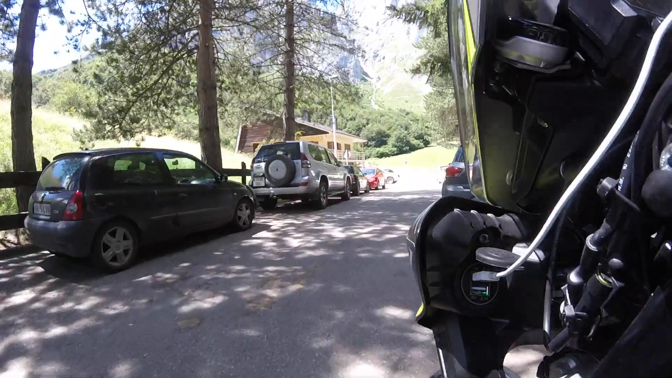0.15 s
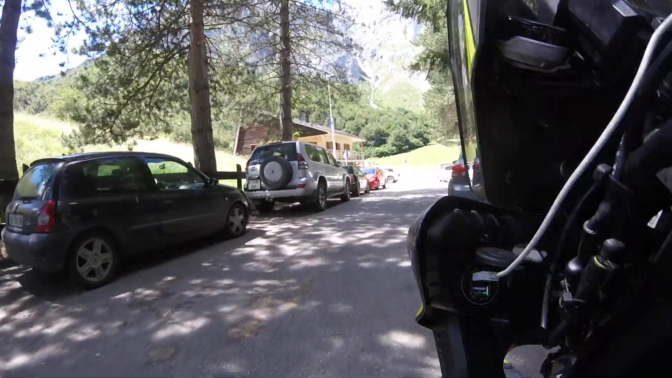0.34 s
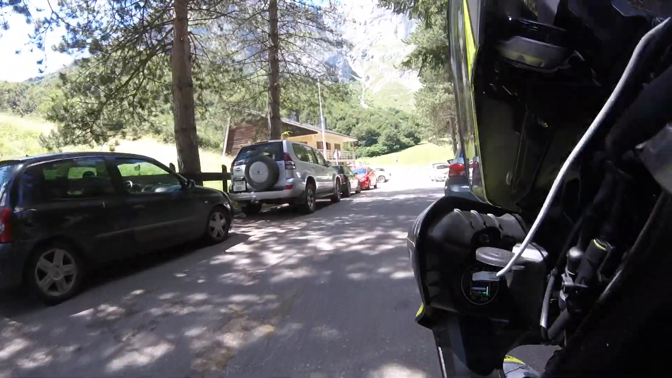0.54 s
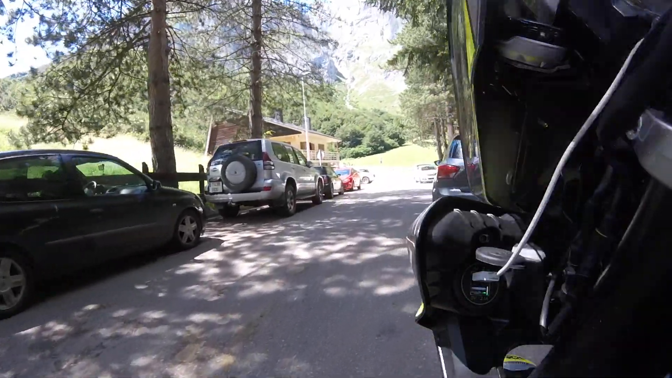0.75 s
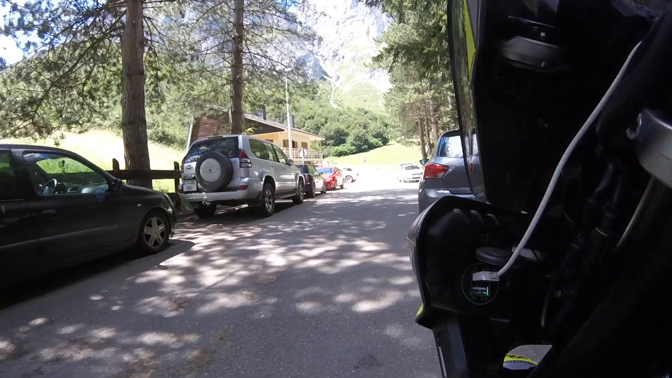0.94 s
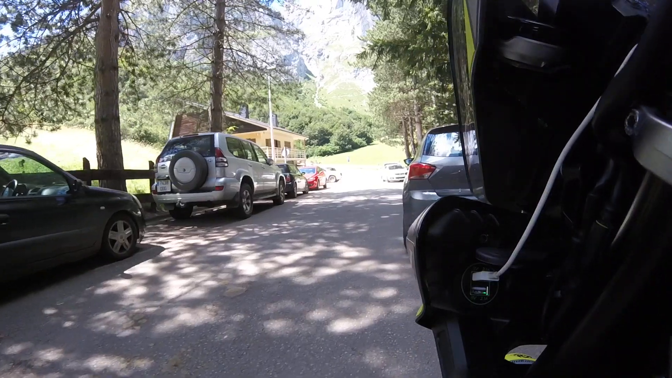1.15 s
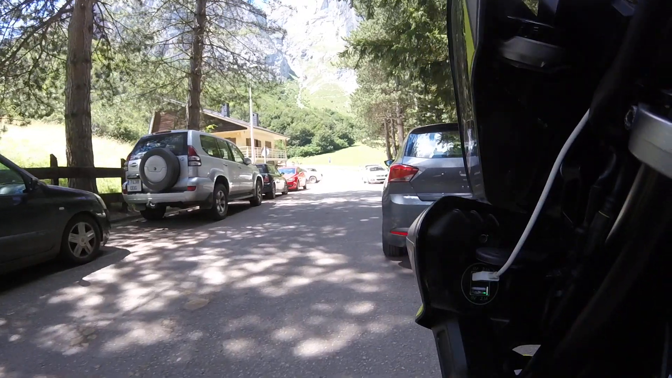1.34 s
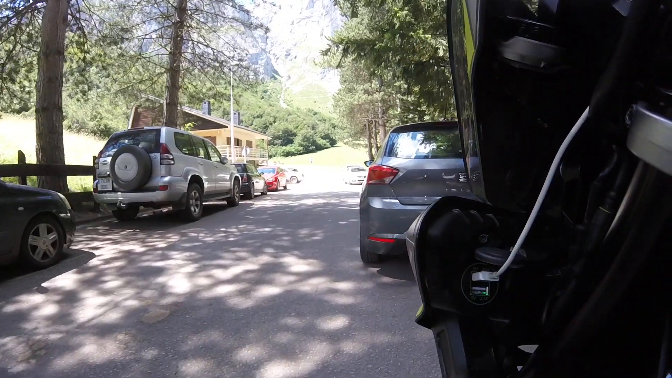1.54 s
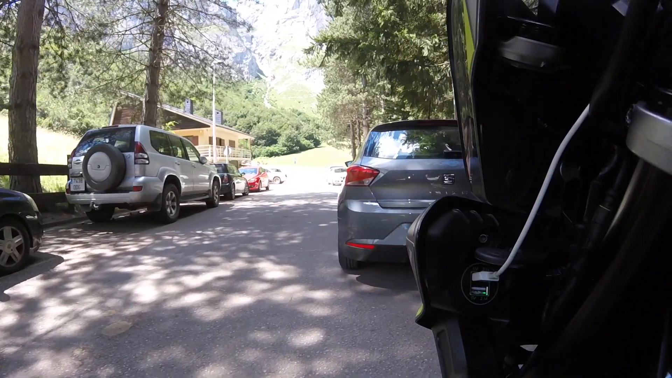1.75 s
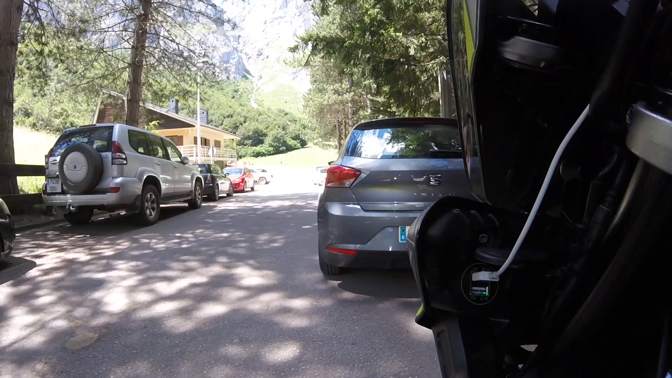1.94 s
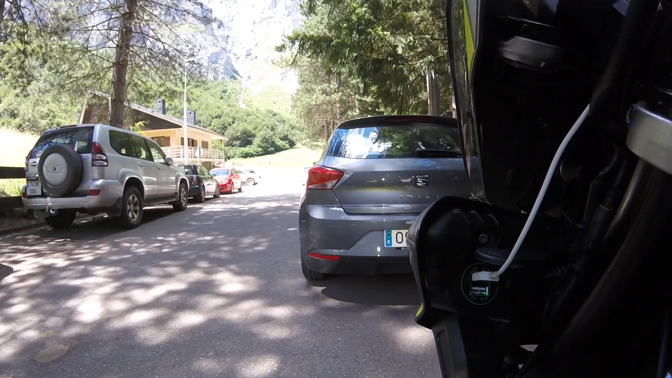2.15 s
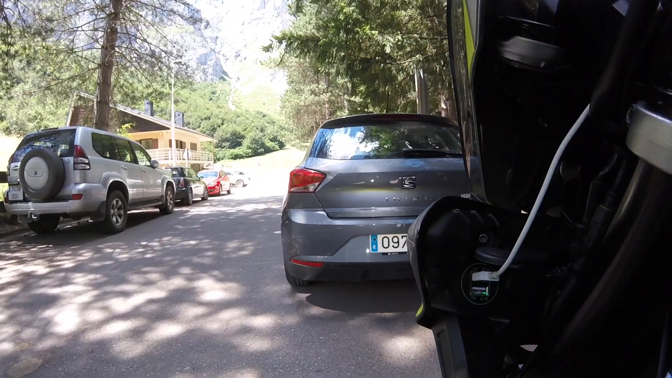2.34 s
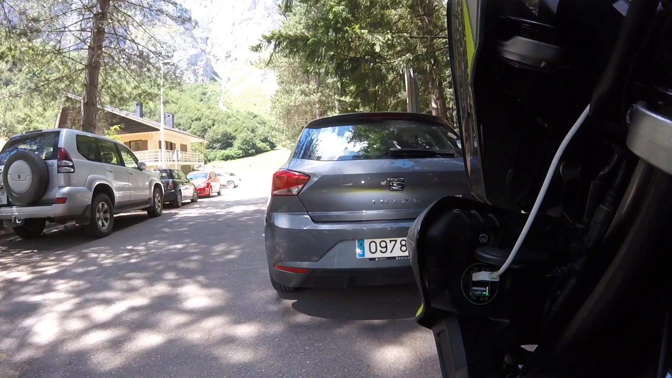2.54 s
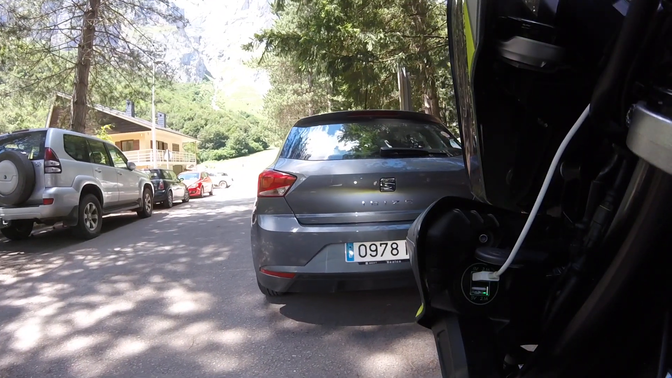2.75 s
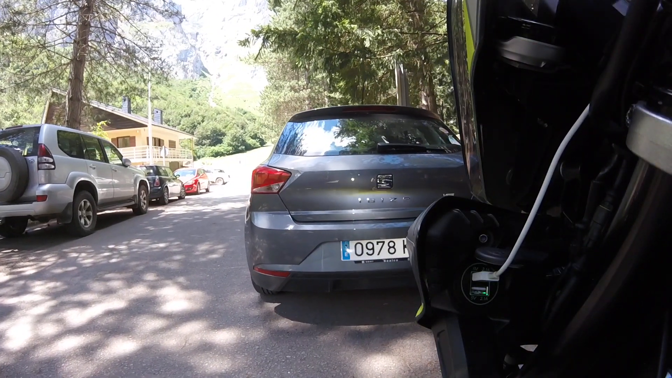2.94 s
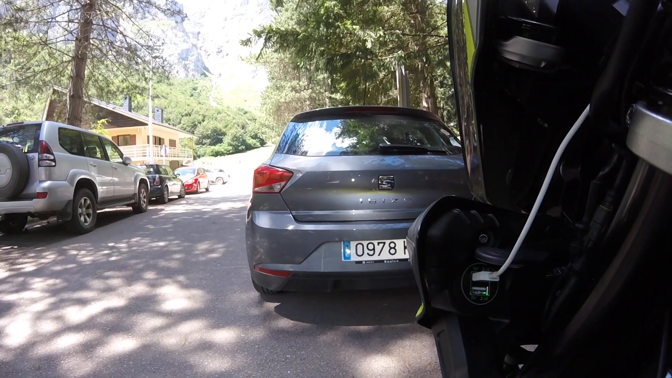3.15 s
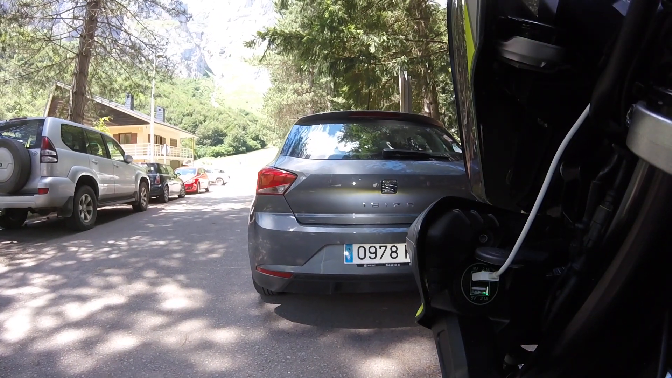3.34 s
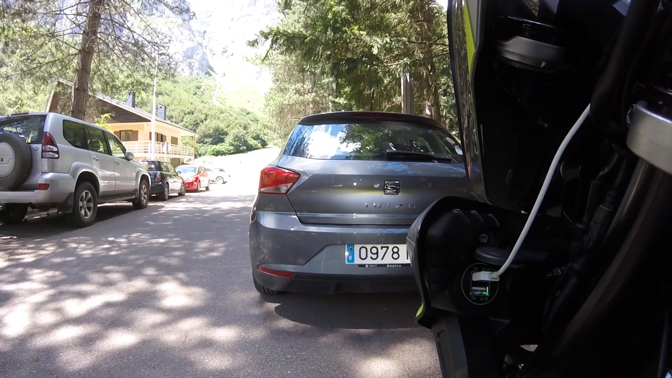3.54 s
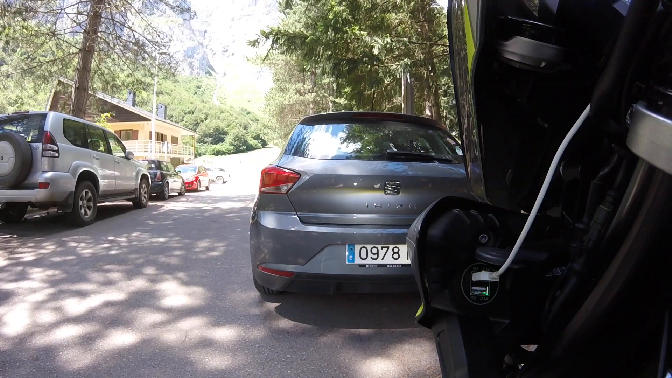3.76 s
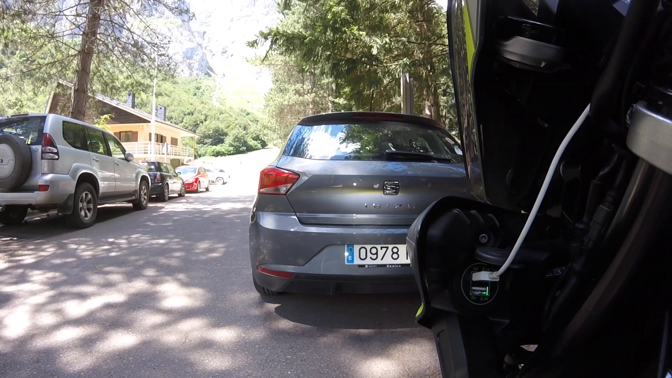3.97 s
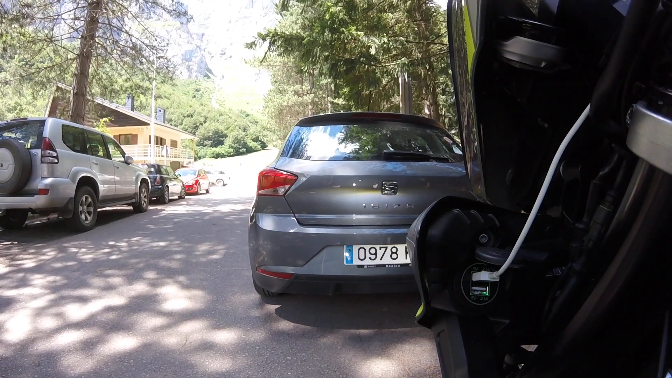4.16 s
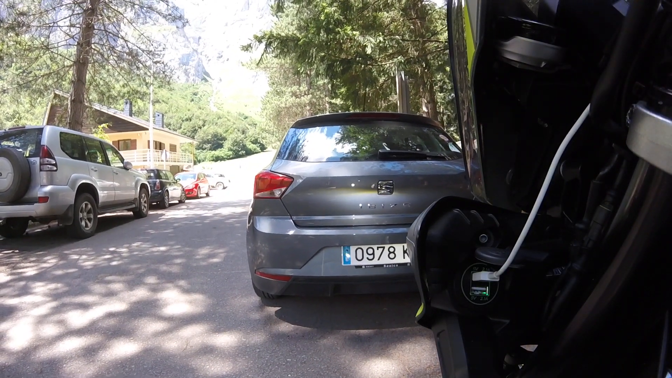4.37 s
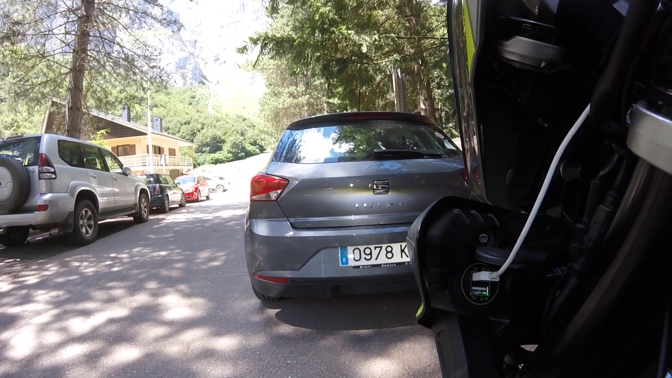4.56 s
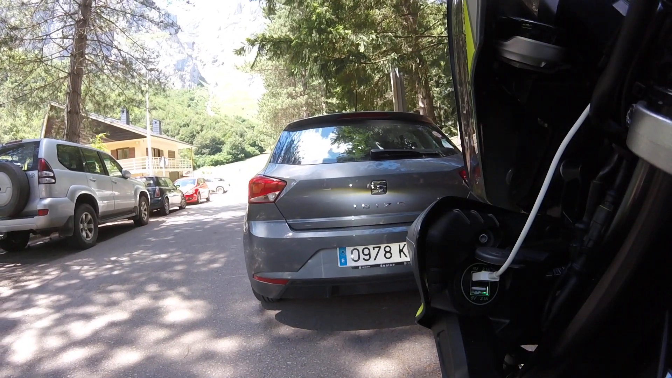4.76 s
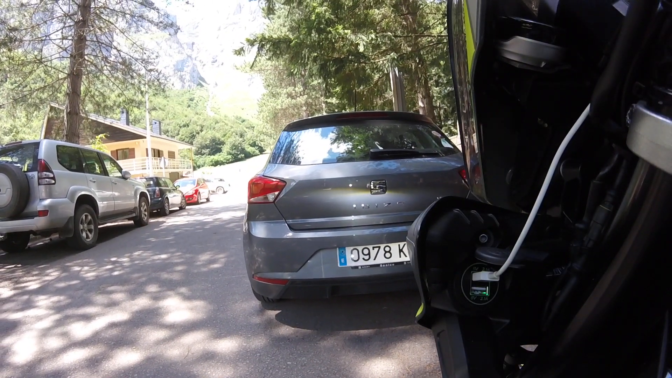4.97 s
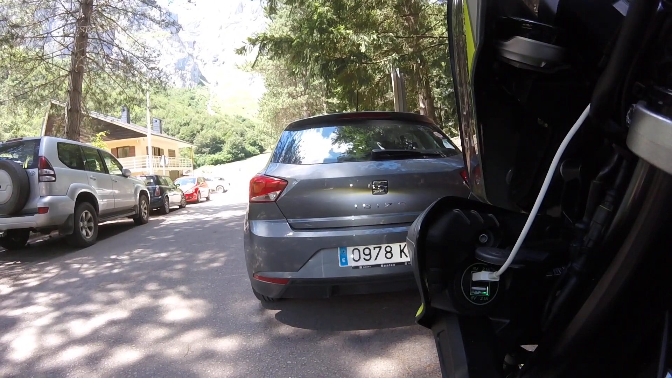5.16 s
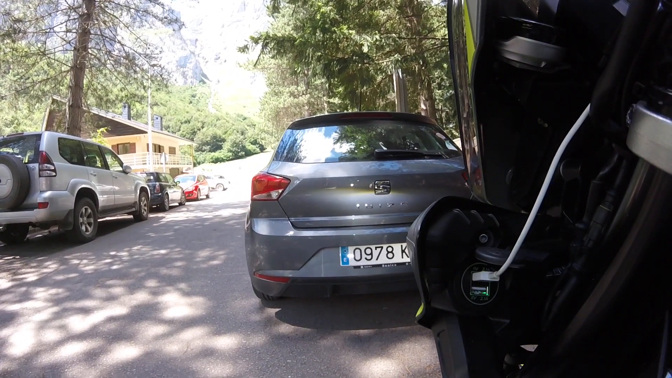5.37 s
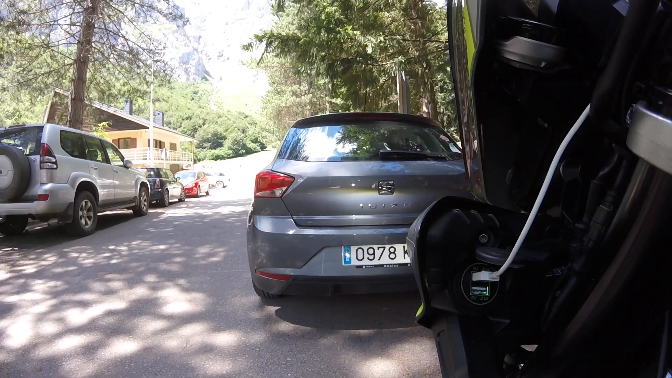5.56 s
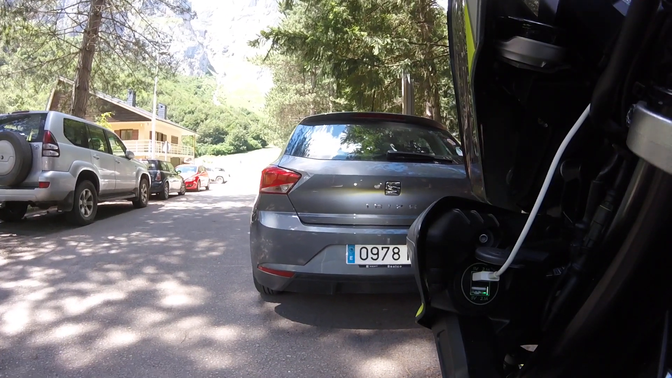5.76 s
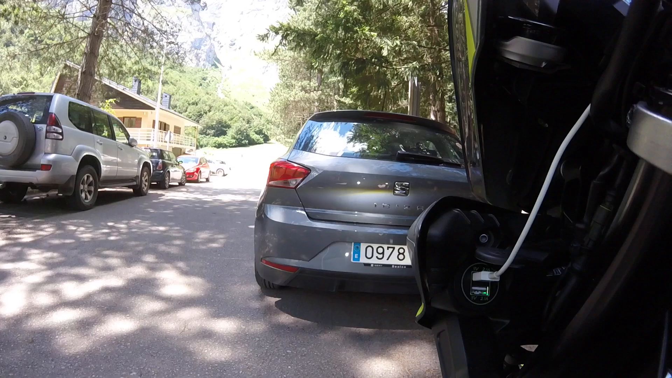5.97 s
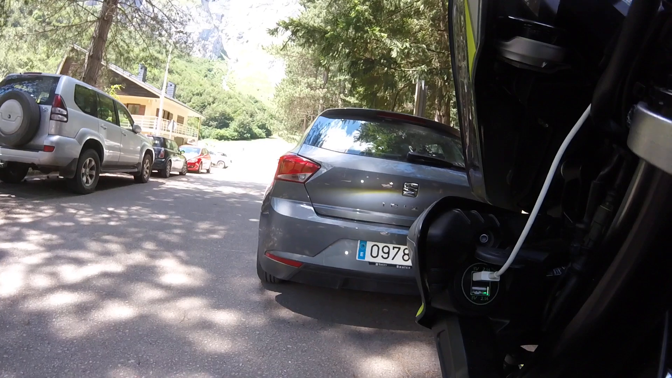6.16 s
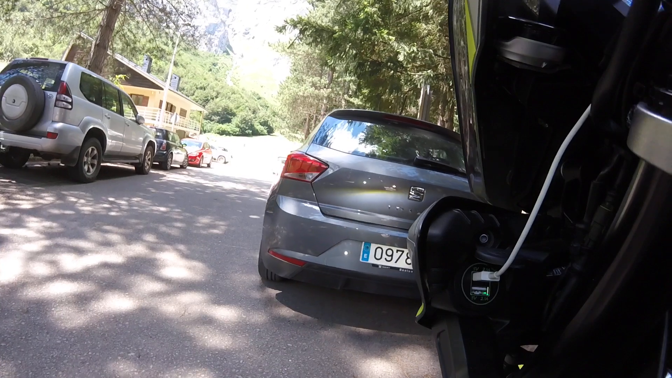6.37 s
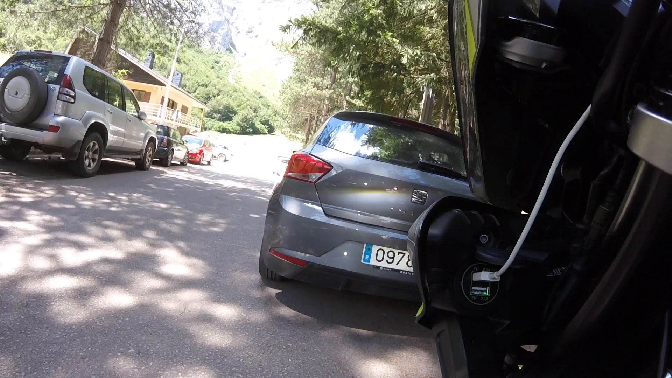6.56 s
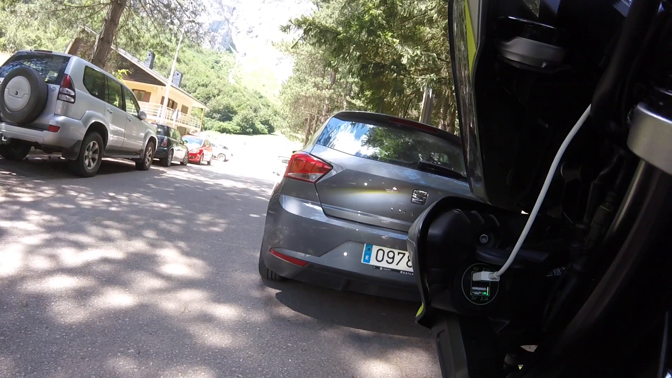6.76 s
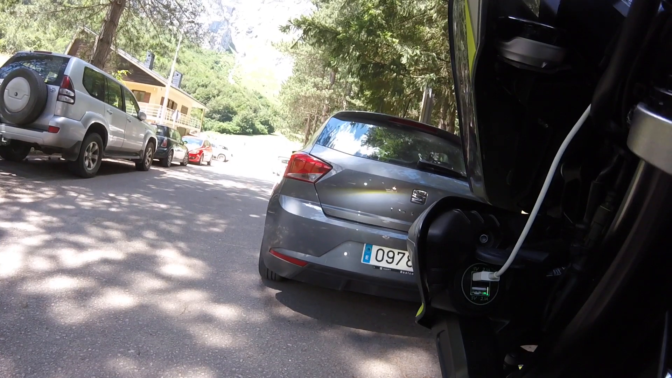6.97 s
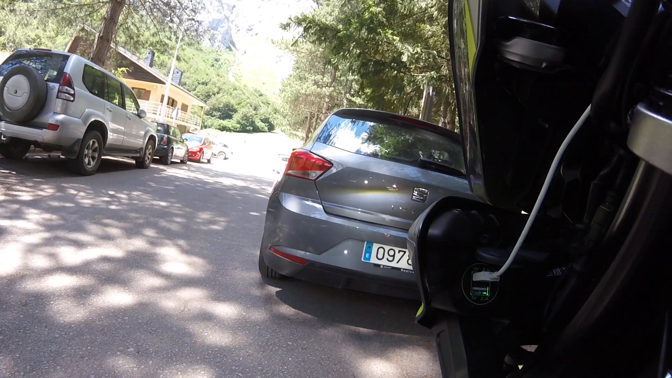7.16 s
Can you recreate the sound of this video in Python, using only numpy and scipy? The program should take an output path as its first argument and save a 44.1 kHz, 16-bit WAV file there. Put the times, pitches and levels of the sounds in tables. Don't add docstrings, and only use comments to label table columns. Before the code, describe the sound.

Bassy shuddering and tyre roar die away as a motorcycle brakes, then a twin engine idles unevenly while boots and stand bump the frame.

```python
import sys
import numpy as np
from scipy import signal
from scipy.fft import rfft, irfft
from scipy.io import wavfile
from scipy.ndimage import uniform_filter1d

SR = 44100
rng = np.random.default_rng(int(sys.argv[2]) if len(sys.argv) > 2 else 0)


def nominal_scale(level):
    x = np.asarray(level, float) / 20
    return 10 ** x


def persist_wave(psi):
    counts = np.round(np.clip(psi, -1, 1) * 32767).astype(np.int16)
    wavfile.write(sys.argv[1], SR, np.atleast_2d(counts).T)


N = 317961


def evened(x):
    return x / np.sqrt(np.mean(x ** 2) + 1e-20)


def columns(rows):
    s, *values = np.transpose(rows)
    return [np.interp(np.arange(N) / SR, s, v) for v in values]


def add(mix, start_s, sound):
    part = mix[max(round(start_s * SR), 0):][:len(sound)]
    part += sound[:len(part)]


def coloured(points):
    f, db = np.transpose(points)
    hz = np.fft.rfftfreq(N, 1 / SR)
    gain = nominal_scale(np.interp(np.log(hz + 1), np.log(f + 1), db))
    return evened(irfft(rfft(rng.standard_normal(N)) * gain, N))


def drift(per_s):
    hz = np.fft.rfftfreq(N, 1 / SR)
    gain = (hz > 0) / (1 + (hz / per_s) ** 4)
    return evened(irfft(rfft(rng.standard_normal(N)) * gain, N))


def resonate(x, hz, width):
    turn = np.exp(2j * np.pi * np.cumsum(hz * np.ones(len(x))) / SR)
    r = np.exp(-np.pi * width / SR)
    return 2 * (turn * signal.lfilter([1 - r], [1, -r], x / turn)).real


def resonate_twice(x, hz, width):
    return evened(resonate(resonate(x, hz, width), hz, width))


def ring(modes, rise, length, polarity=1):
    t = np.arange(round(length * SR))[:, None] / SR
    hz, db, t60 = np.transpose(modes)
    onset = 1 - np.exp(-(t / rise) ** 2)
    sound = (polarity * nominal_scale(db - 60 * t / t60) * np.sin(2 * np.pi * hz * t) * onset).sum(axis=1)
    return sound / abs(sound).max()


def rattle(modes, chatter, length, blow=0):
    samples = np.arange(len(chatter))
    u = samples / (SR * max(length, .001))
    contacts = chatter * np.sqrt(u) * np.exp(-3.0 * u) + blow * (samples == 60)
    body = ring(modes, .0003, .06, (-1) ** np.arange(len(modes)))
    sound = np.convolve(body, contacts)
    return sound / abs(sound).max()


def swells(rows):
    s, db, length = np.transpose(rows)[:3, :, None]
    u = (np.arange(0, N + 32, 32) / SR - s) / length
    gains = nominal_scale(db - 11 * np.where(u < 0, -u / 0.69, u) ** 1.7)
    return np.repeat(gains, 32, axis=1)[:, :N]


# start_s [s], speed [0-1]
SPEED = [(0, 0.9), (.4, 1), (.9, 0.88), (1.5, 0.94), (1.9, 0.41), (2.5, 0.23), (3.2, 0.19), (5.7, 0.11),
         (6.5, 0.14), (7.21, 0.16)]


def loudness(rows, full_speed_db, law):
    rolling = nominal_scale(full_speed_db) * abs(columns(SPEED)[0]) ** law
    power = (swells(rows) ** 2).sum(axis=0) + rolling ** 2
    return np.sqrt(abs(uniform_filter1d(power, size=64)))


# start_s [s], level_db [dB], length_s [s], pitch_hz [Hz]
JOLTS = [(.01, -16.5, 0.058, 62.67), (0.223, -15.5, 0.08, 55.81), (0.33, -16, 0.023, 54.98),
         (0.395, -14.5, 0.051, 57.66), (0.475, -15, 0.045, 56.4), (0.586, -16.5, 0.046, 58.87),
         (0.691, -22, 0.092, 58.5), (0.776, -17.5, 0.1, 61.62), (0.892, -19.5, 0.021, 58.56),
         (0.979, -21, 0.073, 57.16), (1.161, -22.5, 0.022, 60.1), (1.245, -16, 0.052, 56.96),
         (1.303, -17.5, 0.035, 58.4), (1.407, -19, 0.054, 55.55), (1.536, -26.5, 0.045, 53.5),
         (1.725, -26, 0.059, 56.15), (1.916, -27, 0.039, 58.12), (2.116, -29, 0.046, 62.83),
         (2.26, -34.5, 0.066, 62.12), (2.596, -39.5, 0.045, 60.2), (2.788, -33, 0.025, 57.27),
         (3.068, -25.5, 0.042, 57.44), (3.313, -31, 0.025, 55.45), (3.369, -33, 0.058, 53.3),
         (3.724, -27, 0.028, 57.8), (4.049, -34.5, 0.072, 60.16), (4.87, -38, 0.092, 54.13),
         (4.984, -30, 0.033, 60.26), (5.363, -31, 0.075, 59), (5.716, -34.5, 0.027, 62.34)]


def clamp_sway():
    share = swells(JOLTS) + 1e-4
    hz = uniform_filter1d(np.transpose(JOLTS)[3] @ share / share.sum(axis=0), size=900)
    turns = np.cumsum(hz * (1 + 0.0672 * drift(12.9))) / SR
    tone = np.sqrt(2) * np.cos(2 * np.pi * (turns + .4))
    sway = tone + .24 * resonate_twice(rng.standard_normal(N), hz, 60)
    return loudness(JOLTS, -30, 0.85) * evened(sway)


# start_s [s], level_db [dB], length_s [s]
LURCHES = [(.08, -17.5, 0.058), (.3, -19.5, 0.049), (.53, -21, 0.025), (.66, -23.5, 0.095),
           (.88, -25, 0.22), (1.27, -19, 0.024), (1.49, -25.5, 0.06), (1.75, -31.5, 0.32),
           (2.0, -34, 0.045), (2.99, -29, 0.025), (3.73, -42, .06), (5.3, -34, 0.062)]


def fork_wobble():
    turns = np.cumsum(37 * (1 + 0.1654 * drift(6.6))) / SR
    push = resonate_twice(rng.standard_normal(N), 20, 23)
    wobble = np.sqrt(2) * np.cos(2 * np.pi * turns) + 0.1 * push
    return loudness(LURCHES, -31, 1) * evened(wobble)


# start_s [s], rate_hz [four-stroke cycles per s]
CRANK = [(0, 13.49), (.8, 12.22), (1.1, 12.37), (2.2, 12.74), (2.6, 12.28), (2.9, 12.67), (3.2, 12.48),
         (4, 12.82), (4.6, 12.26), (5.1, 12.8), (5.6, 12.26), (6.1, 12.87), (6.9, 12.5), (7.2, 12.52)]
# [even gulps up, odd ones down by this, dB]
IDLE = [(0, -41.5, -2.5), (1, -42, 3.5), (2.2, -37.5, -4), (3.1, -38.5, 4), (4, -35, 2.5), (5.2, -35, 1.3),
        (5.9, -36, -3.5), (6.55, -35.5, 1), (7.21, -37.5, -0.5)]


def crankshaft():
    cycles = .54 + np.cumsum(columns(CRANK)[0]) / SR
    level_db, lope_db = columns(IDLE)
    return cycles, level_db, lope_db, rng.standard_normal((200, 3))


# place [cycles], level_db [dB of the blow]
FIRINGS = [(-.510, -3.2), (-.113, 0)]
# pitch_hz [Hz], level_db [dB], t60_s [s]
PIPE = [(36.3, -22, .4), (68.5, -23, .4), (103, -14.5, .205), (135, 0, .092), (163.5, -16, .17)]
PIPE_POLARITY = [-1, 1, -1, -1, 1]


def exhaust(cycles, luck):
    blows = np.zeros(N)
    for k, (place, db) in enumerate(FIRINGS):
        whole = np.floor(cycles - place)
        at = np.flatnonzero(np.diff(whole))
        blows[at] = nominal_scale(db + .9 * luck[whole[at].astype(int), k])
    modes = ring(PIPE, .0038, .35, np.array(PIPE_POLARITY))
    pipe = evened(signal.oaconvolve(blows, modes)[:N])
    silencer = signal.butter(N=6, Wn=195, fs=SR, output="sos")
    pipe = signal.sosfiltfilt(silencer, pipe)
    edge = ring([(212, 0, 0.045)], rise=0.0045, length=.06)
    bark = evened(signal.oaconvolve(blows, edge)[210:][:N])
    return pipe + nominal_scale(-21) * bark


# pitch_hz [Hz], width_hz [Hz], level_db [dB]
AIRBOX = [(275, 30, -1), (325, 45, 2), (362, 60, 2), (445, 50, 0), (530, 230, -11.5)]


def intake(cycles, lope_db, luck):
    open_share = .36
    since = (cycles + .48) % 1
    count = (cycles + .48).astype(int)
    strength_db = lope_db * (-1) ** count + 1.2 * luck[count, 2]
    shut = 1 / (1 + np.exp((open_share - since) / 0.028))
    gulp = nominal_scale(strength_db - 5 * (shut + since)) * np.minimum(since / 0.01, 1)
    valve_snap = nominal_scale(22 + strength_db) * np.diff(count, prepend=count[0])
    puff = (.8 * gulp + .08) * rng.standard_normal(N) + valve_snap
    hiss = sum(nominal_scale(db) * resonate_twice(puff, hz, w * 1.34) for hz, w, db in AIRBOX)
    honk_hz = 363.8 * (1 + 0.032 * luck[count, 0] + .08 * np.minimum(since / open_share, 1))
    honk_gain = nominal_scale(strength_db - 8 * since) * (1 - shut) * np.minimum(since / .05, 1)
    honk = honk_gain * np.sin(2 * np.pi * np.cumsum(honk_hz) / SR)
    return evened(evened(hiss) + nominal_scale(-.5) * evened(honk))


# pitch_hz [Hz], level_db [dB per Hz]
CASE = [(400, -26.5), (600, -1.5), (800, -4), (1280, -3.5), (1600, -7), (2400, -9.5), (3200, -6.5),
        (3700, -13.5), (4500, -16), (6100, -19.5), (7500, -23), (11800, -29.5), (13000, -32),
        (16000, -46.5)]
# pitch_hz [Hz], width_hz [Hz], level_db [dB]
CASE_RINGS = [(1270, 60, -8), (2534, 69, -17.5), (3235, 170, -9)]


def case_hiss(cycles):
    flutter_db = 0.35 * np.cos(2 * np.pi * (cycles + 0.66)) + 0.11 * np.cos(2 * np.pi * 3 * cycles)
    flutter_db = flutter_db + 0.34 * drift(65)
    ticks = nominal_scale(3.7 * np.minimum(rng.exponential(1, N), 3)) * (rng.random(N) < 150 / SR)
    ticks = signal.lfilter([1], [1, -np.exp(-1 / (0.0032 * SR))], ticks)
    hiss = coloured(CASE)
    for hz, width, db in CASE_RINGS:
        hiss = hiss + nominal_scale(db) * evened(resonate(rng.standard_normal(N), hz, width))
    return nominal_scale(-59.5) * evened(hiss * nominal_scale(flutter_db) * (1 + 0.073 * ticks))


# pitch_hz [Hz], level_db [dB per Hz]
TYRE = [(400, -14.5), (700, -8.5), (1300, 3), (1700, -2), (2300, -2.5), (2900, 3), (3600, -7.5),
        (4300, -5.5), (4900, -17.5), (6100, -11.5), (6700, -20.5), (8000, -23), (12000, -41.5),
        (16000, -47.5)]
# pitch_hz [Hz], level_db [dB per Hz]
SCUFF = [(70, -37), (110, 4.5), (160, 2), (215, -9), (260, -11), (350, -13), (520, -21), (620, -25),
         (800, -47.5), (1200, -76.5)]
# start_s [s], scuff_db [low scuff dB], grit_db [dB], length_s [s]
SCRAPES = [
    (0.998, -48, -63, 0.28),
    (1.512, -42.5, -72, 0.33),
    (2.3, -48, -66, 0.14),
    (3.743, -38.5, -62, 0.11),
    (5.099, -39.5, -60, 0.042),
    (6.278, -50, -63.5, 0.19),
]


def ground():
    s, scuff_db, grit_db, length = np.transpose(SCRAPES)
    tyre = evened(coloured(TYRE) * nominal_scale(2.35 * drift(31)))
    scuff = evened(coloured(SCUFF) * nominal_scale(2.3 * drift(39)))
    scuff = scuff + 0.085 * resonate_twice(scuff, 456, 77)
    roar = loudness(np.c_[s, grit_db, length], -58.5, 0.99) * tyre
    drag = loudness(np.c_[s, scuff_db, length], -52.5, 0.065) * nominal_scale(6.5) * scuff
    return roar + drag


# start_s [s], level_db [dB], length_s [s]
BRAKING = [
    (1.2, -56.5, 0.26),
    (3.185, -61, 0.054),
    (3.725, -59, 0.074),
]


def disc_rub():
    return loudness(BRAKING, -70, 0.81) * resonate_twice(rng.standard_normal(N), 1330, 350)


# pitch_hz [Hz], level_db [dB]
WHINE = [(9600, -99)]


def fuel_pump():
    t = np.arange(N) / SR
    return sum(nominal_scale(db) * np.sin(2 * np.pi * hz * t) for hz, db in WHINE)


# start_s [s], level_db [dB], pitch_hz [Hz], t60_s [s], rise_s [s]
THUMPS = [(.12, -27.5, 100, 0.29, .01), (.56, -28, 101, .25, 0.0083), (1.85, -31, 100, .2, .01),
          (1.05, -30, 100, .2, .01), (.75, -28, 100, .25, .01), (1.498, -30, 102, .2, .01),
          (1.369, -20, 119, 0.11, 0.003), (4.614, -14, 82, 0.11, 0.028), (4.68, -28, 60, .15, .006),
          (.49, -26, 100, .2, .008), (5.187, -20, 72, .2, .006), (5.237, -22, 75, .12, .005),
          (4.78, -22, 62, 0.16, 0.02), (5.084, -9, 55, 0.36, 0.014), (5.0855, -13, 96, 0.5, 0.003),
          (1.539, -26.5, 226, 0.043, .002), (5.121, -18, 138.3, 0.19, 0.0026),
          (6.207, -21.5, 98.3, 0.27, 0.01), (6.2455, -13, 86, 0.2, 0.0024),
          (6.265, -9.5, 52.8, 0.46, 0.0055), (6.381, -27, 59, 0.29, 0.0076)]


def thumps():
    out = np.zeros(N)
    for s, db, hz, t60, rise in THUMPS:
        modes = [(hz, 0, t60), (hz * 0.94, -9, t60 * 1.1)]
        add(out, s, nominal_scale(db) * ring(modes, rise, length=0.26))
    return out


def struck_tube(rows, hz):
    out = np.zeros(N)
    for s, db, over_db, over_hz in rows:
        modes = [(hz, 0, .04), (over_hz, over_db, .04),
                 (hz * 2.3, -20, .025), (over_hz * 1.2, over_db - 12, .02)]
        add(out, s, nominal_scale(db) * ring(modes, rise=0.004, length=0.07))
    return out


# start_s [s], level_db [dB], overtone_db [dB], overtone_hz [Hz]
KNOCKS = [(0.292, -36.5, 1, 474), (0.34, -48, -8, 500), (0.412, -49.5, -6, 500), (0.497, -32, -10.5, 550),
          (0.556, -33, -9, 517), (0.72, -33.5, 0, 495), (1.082, -28.5, -5.5, 533), (1.45, -27, -22, 460),
          (1.554, -25.5, -12, 660), (1.759, -26, -13.5, 620), (1.924, -29.5, -11, 483),
          (2.131, -28.5, -13, 582), (2.18, -29, -22, 610), (2.224, -34.5, -5, 440), (2.255, -33, -12, 466),
          (2.329, -30.5, -18, 610), (2.619, -46, -2, 445), (3.703, -27, -14, 470), (3.731, -38, -20, 453),
          (3.763, -33, 0, 500), (6.425, -33, 4, 487), (1.729, -38, 9, 490), (2.069, -44, 6, 433),
          (2.41, -44, 3, 593), (2.468, -47, 2, 590)]


def frame_knocks():
    return struck_tube(KNOCKS, 243.7)


# start_s [s], level_db [dB], pitch_hz [Hz], t60_s [s]
PINGS = [(.342, -46, 1080, .04), (.558, -51, 1290, 0.027), (0.417, -54, 1315, 0.037),
         (0.487, -46, 1340, .04), (6.227, -52, 2630, 0.036), (4.479, -44, 1190, 0.042),
         (.823, -57, 2450, .04), (1.542, -52, 2530, .04), (1.542, -47, 1160, 0.03),
         (1.564, -44, 2640, 0.023), (1.574, -52, 2530, .08), (1.565, -41.5, 1283, 0.035),
         (1.655, -57, 2530, 0.027), (1.673, -51, 1390, 0.035), (3.678, -52, 2520, .04),
         (3.685, -46.5, 2560, 0.047), (3.708, -53, 2460, .08), (3.72, -53, 2530, .04),
         (3.714, -42, 1384, 0.053), (3.763, -47, 1060, .06), (4.122, -54, 2500, .05),
         (4.315, -52, 1235, .04), (4.364, -52, 1260, 0.043), (4.484, -53, 2480, 0.063),
         (4.636, -58, 1850, .05), (4.948, -54, 2380, .05), (5.0795, -41.5, 2430, 0.028),
         (5.093, -56, 2610, .06), (5.099, -44, 1250, 0.032), (5.152, -49.5, 1280, 0.053),
         (6.214, -50, 2410, .07), (6.26, -53, 2640, .04), (6.361, -52.5, 2390, 0.043),
         (6.385, -53, 1170, 0.073), (6.433, -46, 1320, 0.022)]


def bracket_pings():
    out = np.zeros(N)
    for s, db, hz, t60 in PINGS:
        modes = [(hz, 0, t60), (hz * 1.2, -10, t60 * 0.49)]
        add(out, s, nominal_scale(db) * ring(modes, rise=0.00062, length=.08))
    return out


# start_s [s], level_db [dB], brightness_db [dB], length_s [s]
TICKS = [(0.557, -42, 1, 0.0063), (0.721, -49, 0, 0.0063), (0.853, -47, -15, 0.006),
         (0.898, -43, -5, 0.012), (0.954, -62, -5, 0.007), (0.994, -36.5, -3.5, 0.005),
         (1.012, -56, 4, 0.007), (1.052, -40.5, -2, 0.012), (1.088, -43, -14, 0.0076),
         (1.188, -42, -7, 0.0038), (1.672, -42, -8, 0.0059), (1.924, -40, -16, 0.0026),
         (3.195, -46.5, -8, 0.007), (3.683, -55, -1, 0.0093), (3.711, -41, -18, 0.01),
         (4.12, -56, 4, 0.0084), (4.314, -51, 5, 0.007), (4.475, -36, -2, 0.026), (4.637, -47, -3, 0.0093),
         (4.915, -49, -8, 0.0078), (4.946, -41.5, -6, 0.0089), (5.079, -38.5, -2, 0.0045),
         (5.0844, -35, -15.5, 0.0096), (5.1, -55.5, -5, 0.0077), (6.209, -41, -8, 0.038),
         (6.232, -43.5, -15, 0.013), (6.26, -39, 0, 0.0063), (6.364, -48, -2, 0.0077),
         (6.4265, -33.5, -7.5, 0.0017), (5.088, -41, -5, .022), (5.135, -47, -8, .008),
         (6.258, -44, -8, .012), (1.559, -38, -4, .008)]
# pitch_hz [Hz], level_db [dB], t60_s [s]
SHELL = [(600, -6, .01), (850, -5, .01), (1150, -1, .014), (1370, -1, .018), (1700, -3, .009),
         (2050, -4, .009), (2520, -1, .022), (2950, -5, .009), (3600, -9, .008), (4300, -14, .007),
         (5000, -15, .007), (6000, -15, .007)]


def housing_ticks():
    out = np.zeros(N)
    for s, db, bright_db, length in TICKS:
        shell = [(f, d + bright_db * 0.9 * np.log2(f / 1300), t60) for f, d, t60 in SHELL]
        add(out, s, nominal_scale(db) * rattle(shell, rng.standard_normal(1300), length, blow=2.0))
    return out


# start_s [s], level_db [dB], length_s [s]
SQUEAK = [
    (.962, -71, .014),
    (.98, -61.5, 0.013),
    (1.003, -80, .02),
]


def brake_squeak():
    turns = 11700 * np.arange(N) / SR + .2 * drift(60)
    tone = np.sqrt(2) * np.sin(2 * np.pi * turns) * (1 + .4 * drift(250))
    return swells(SQUEAK).sum(axis=0) * tone


# start_s [s], level_db [dB], length_s [s]
HUMS = [
    (1.34, -50, 0.12),
    (1.6, -55.5, 0.22),
    (2.45, -63, 0.44),
    (5.11, -51, 0.05),
]


def tube_hum():
    return swells(HUMS).sum(axis=0) * resonate_twice(rng.standard_normal(N), 527, 170)


# pitch_hz [Hz], level_db [dB], t60_s [s]
LEVER = [(400, -13, 0.013), (654, -10, 0.034), (1020, -10, 0.018), (1364, -11.5, 0.03),
         (1730, -8.5, 0.0088), (2130, -1, 0.012), (2480, -1, 0.011), (2780, -2.5, 0.01), (3574, -2, 0.018),
         (4300, -18, 0.0098), (5070, -11, 0.012), (5850, -14, 0.0087), (6320, -16, 0.0072),
         (7600, -31, 0.0097)]


def lever_snap():
    out = np.zeros(N)
    add(out, 1.5545, nominal_scale(-19) * rattle(LEVER, rng.standard_normal(800), .007, blow=4))
    return out


# start_s [s], level_db [dB], length_s [s]
STAY = [
    (2.39, -56, .045),
    (2.47, -57, .015),
    (4.99, -60, .045),
    (5.15, -58, .035),
]


def singing_stay():
    return swells(STAY).sum(axis=0) * evened(resonate(rng.standard_normal(N), 610, 25))


# start_s [s], level_db [dB], overtone_db [dB], overtone_hz [Hz]
STAND = [
    (5.084, -36, 2, 390),
    (6.232, -34, -4, 533),
]


def side_stand():
    return struck_tube(STAND, 272)


def scene():
    cycles, level_db, lope_db, luck = crankshaft()
    motor = nominal_scale(level_db) * (exhaust(cycles, luck) + nominal_scale(-18.5) * intake(cycles, lope_db, luck))
    mount = clamp_sway() + fork_wobble()
    steady = case_hiss(cycles) + ground() + disc_rub() + fuel_pump()
    impacts = thumps() + frame_knocks() + bracket_pings() + housing_ticks() + lever_snap() + side_stand()
    tones = brake_squeak() + tube_hum() + singing_stay()
    return (mount + motor + steady + impacts + tones)[None]


def thinned_treble(x):
    hz, t, z = signal.stft(x, SR, nperseg=2048, window="cosine")
    hz = hz[:, None]
    at = np.minimum((t * SR).astype(int) // 1024 * 1024, N - 1)
    chance_fast, chance_slow = drift(14)[at], drift(4)[at]
    power_db = 10 * np.log10(uniform_filter1d(x ** 2, size=2000)[at] + 1e-12)
    buzzing = power_db + 4 * chance_fast > -21
    ceiling = 12750 - 900 * columns(SPEED)[0][at] + 600 * np.round(chance_slow)
    ceiling = np.where(buzzing, 12800, ceiling)
    clicks = (np.arange(N) % 128 == 0) * (1 + .5 * rng.standard_normal(N))
    buzz = signal.stft(nominal_scale(-91) * evened(clicks), SR, nperseg=2048, window="cosine")[2] * buzzing
    bar = np.clip(.2 * (hz - 6500) / 1000, 0, 1.1) * uniform_filter1d(abs(z), size=15, axis=0)
    patches = uniform_filter1d(rng.standard_normal(z.shape), size=7, axis=0)
    patches = evened(uniform_filter1d(patches, size=2, axis=1))
    patch_bar = np.clip((hz - 10800) / 1500, -3, -.4) + .5 * chance_fast - 9 * (abs(z) > nominal_scale(-92))
    opening = t < .03
    z = z * ((abs(z) > bar) & (patches > patch_bar) | buzzing | opening)
    z = np.where((hz < ceiling) | opening, z, buzz * (hz < 15700))
    return signal.istft(z, SR, nperseg=2048, window="cosine")[1][None, :N]


def low_pass(x):
    return signal.sosfilt(signal.butter(12, 15700, fs=SR, output="sos"), x)


def record(dry):
    mix = thinned_treble(dry[0])
    return low_pass(mix)


dry = scene()
out = record(dry)
persist_wave(out)
```